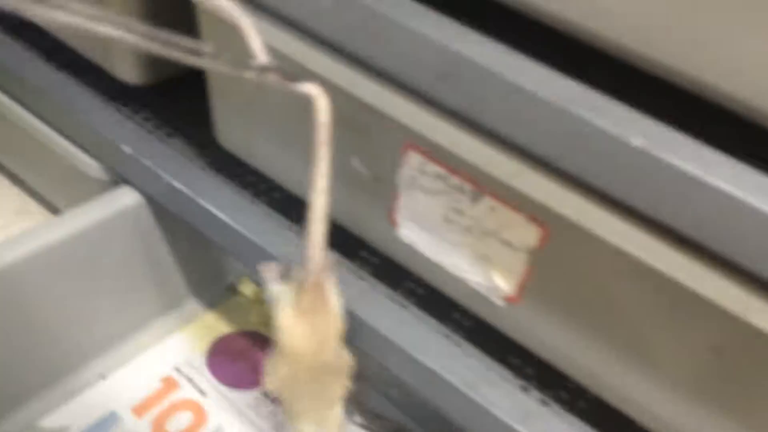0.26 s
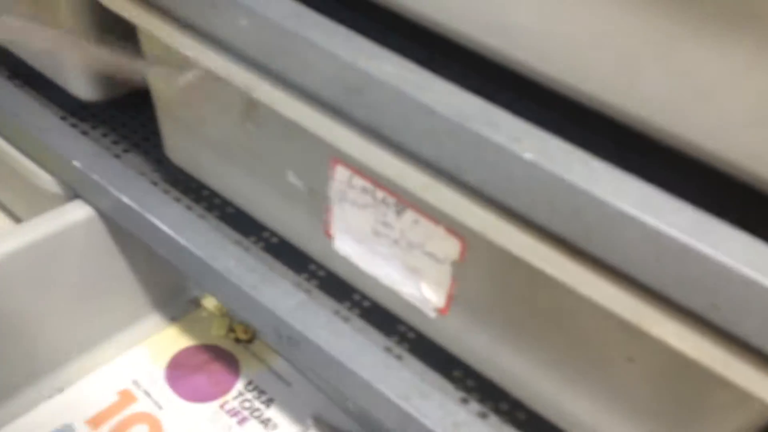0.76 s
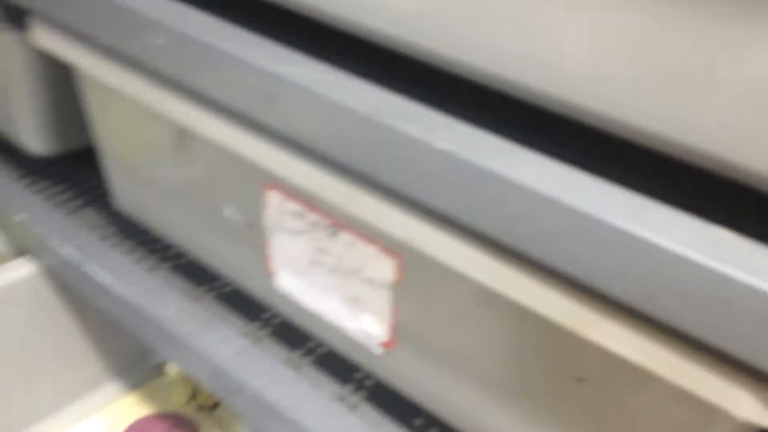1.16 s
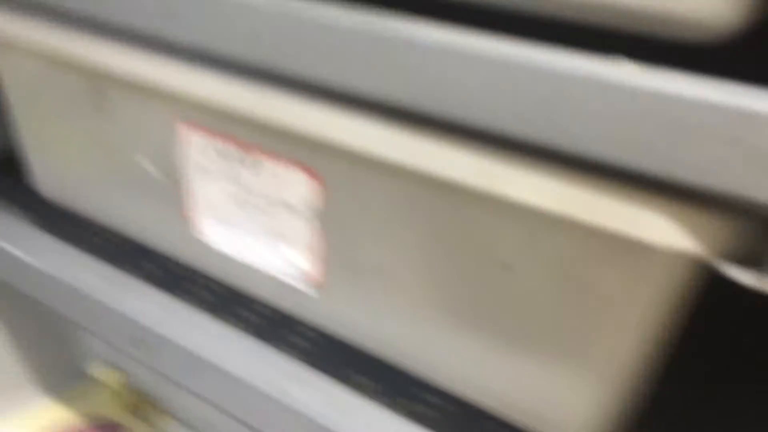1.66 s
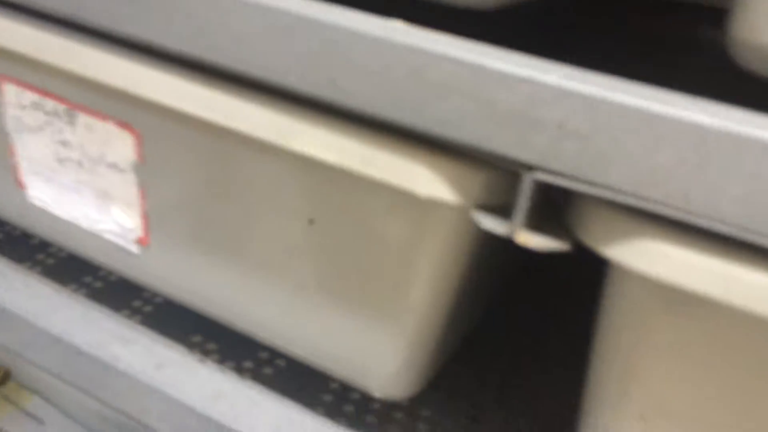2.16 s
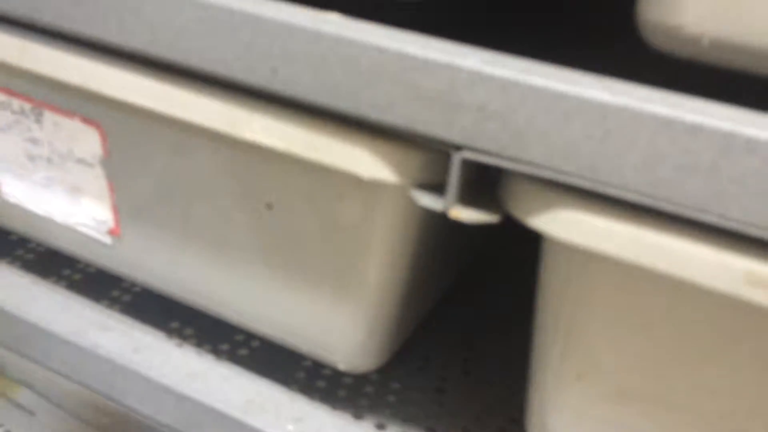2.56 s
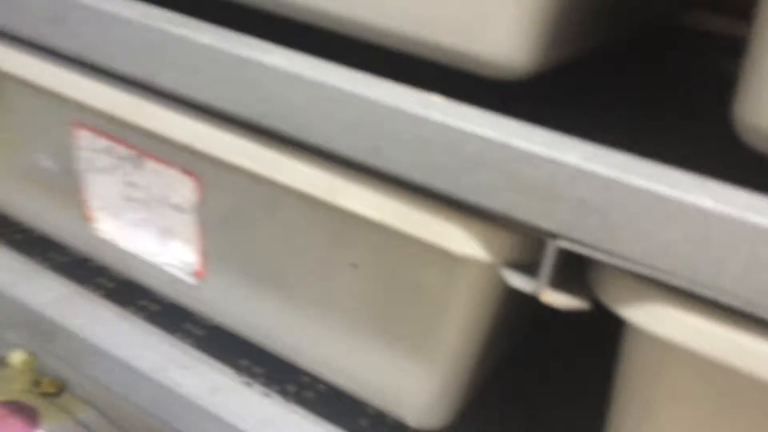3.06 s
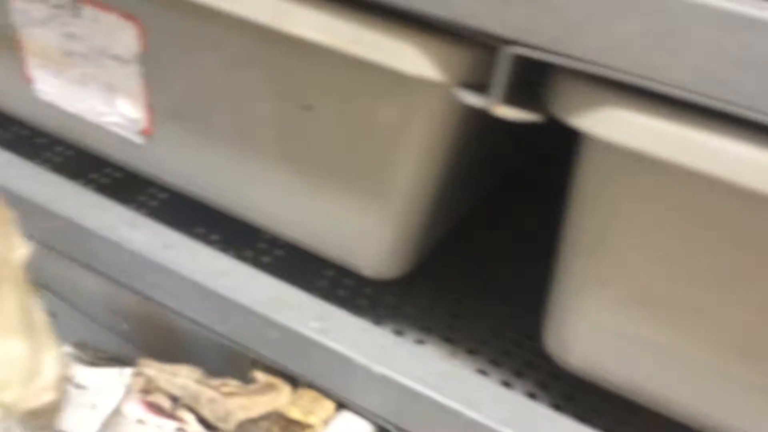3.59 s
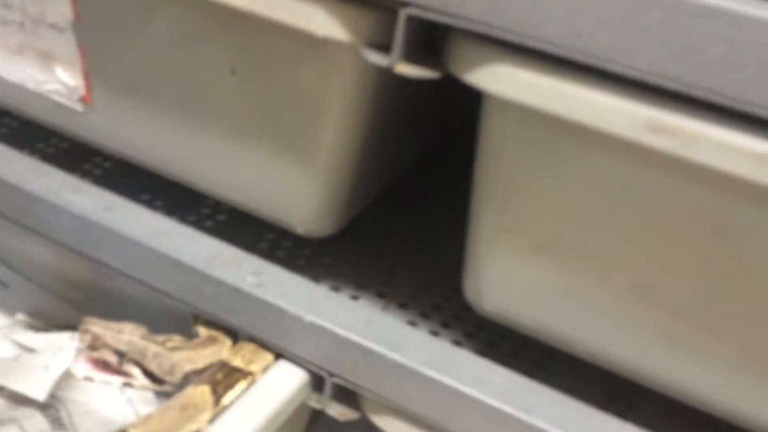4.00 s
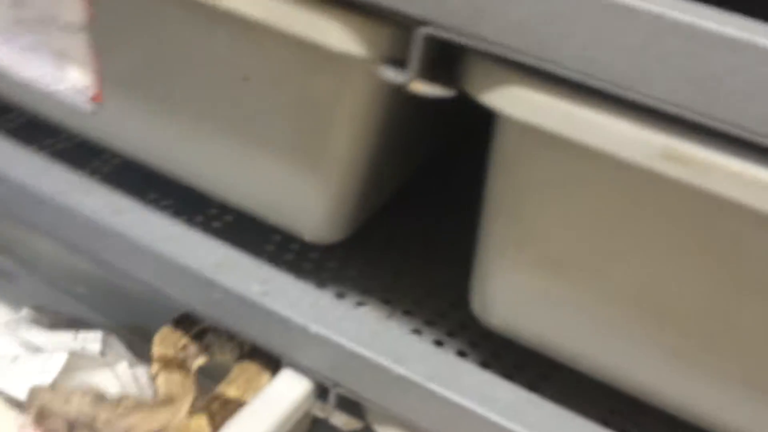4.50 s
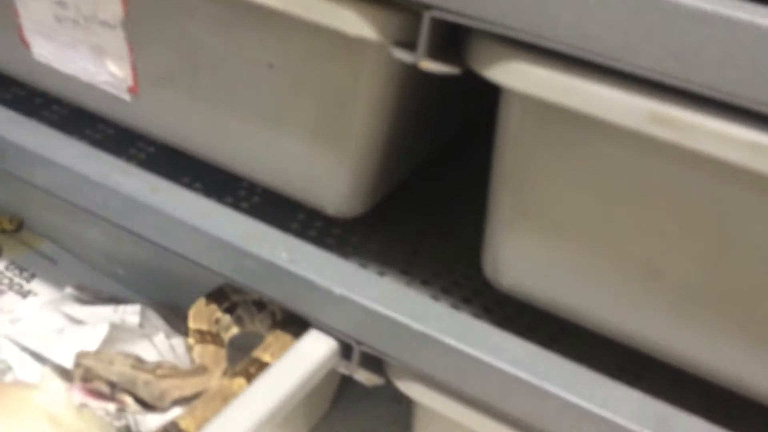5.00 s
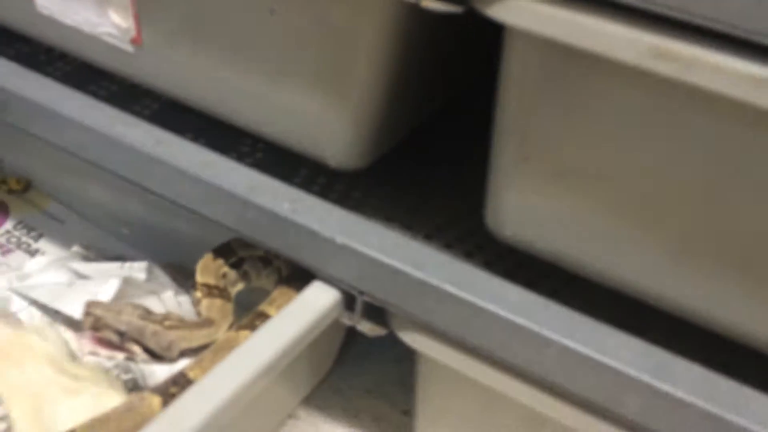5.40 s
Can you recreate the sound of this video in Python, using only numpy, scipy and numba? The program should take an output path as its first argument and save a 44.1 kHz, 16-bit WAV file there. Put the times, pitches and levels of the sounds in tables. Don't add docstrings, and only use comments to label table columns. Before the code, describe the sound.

Close, dry mono phone sound in an indoor rack room with faint ventilation and a barely audible low hum. At 0 s the end of a snake's hiss fades away within half a second. Paper slides and its creases snap crisply from about 0.15 s, densest between 0.6 and 0.95 s, with a sharp steel-tongs clack at 0.6 s. From 1 to 2.7 s only light rustles and scattered crinkles remain, with a very thin airy whistle. At about 2.75 s a long, rough, breathy hiss bursts in, strongest near 2.9 s, with low hollow thumps of coils on plastic around 3.1 s. It eases, with a lighter knock at 3.76 s. Near 4.2 to 4.45 s come bright metallic ticks, a cluster of dull thumps and dragging, as the hiss swells again around 4.4 s. It weakens gradually, with another hollow knock and scuff at 5.13 to 5.2 s, still hissing softly at the end.

```python
import sys
import numpy as np
from scipy import signal
from scipy.fft import rfft, irfft
from scipy.io import wavfile
from scipy.ndimage import uniform_filter1d, minimum_filter1d
from numba import njit

SR = 44100
rng = np.random.default_rng(int(sys.argv[2]) if len(sys.argv) > 2 else 0)


def volts_from_db(level):
    exponent = np.asarray(level, float) / 20
    return 10 ** exponent


def materialize(psi):
    bounded = np.clip(np.atleast_2d(psi).T, -1, 1)
    quanta = np.round(bounded * 32767).astype(np.int16)
    wavfile.write(sys.argv[1], SR, quanta)


N = 249165

# frequency in Hz, level in dB per Hz.
ROOM_SPECTRUM = [(15, -35), (25, -18), (64, -21), (198, -1.5), (304, -19), (565, -2.5), (1140, -7),
                 (1700, -12), (1810, 5), (1930, -12), (4850, -4.5), (6180, 2), (9240, -7.5), (12400, 1),
                 (15400, -2.5)]
# frequency in Hz, width in Hz, level in dB.
MAINS_HUM = (60, 5.2, -72.5)
# time in seconds, depth in dB, half-length in seconds.
GATE_CLOSINGS = [
    (0.579, -15, 0.031),
    (1.42, -1, 0.067),
    (1.55, -2, 0.046),
    (1.763, -2.5, .04),
    (2.736, -32, 0.036),
]
# peak in seconds, level in dB, seconds to rise 10 dB,
# seconds to fall 10 dB, pitch in Hz.
INHALES = [
    (1.5, -63.5, 4, -0.1, 6050),
    (2.64, -62, -0.2, 1, 5200),
]

# peak in seconds, level in dB, seconds to rise 10 dB, seconds to fall 10 dB,
# treble relative to level in dB.
PAPER_STROKES = [(.25, -54, 4, 0, -9), (.4, -51.5, 3, 0.17, -9), (.51, -52, 0.5, 0, -3),
                 (.7, -46.5, 0.2, -0.1, -23), (.76, -50, -0.07, 0.46, -22), (.86, -50, 0.1, -0.03, -32),
                 (.92, -40.5, 0.15, 0.09, -27), (1.05, -49, 0.13, 0.08, -6), (1.26, -53.5, 0.4, 0.18, -9),
                 (1.45, -62, -2, 0.3, -3), (1.67, -52, 0, 0, -10), (1.76, -68, 0.1, -1.5, -11),
                 (1.845, -56, 0.025, 0.08, -4), (2.02, -59.5, 0.15, 0.2, -3.5),
                 (2.2, -58.5, 0.13, 0.59, -11), (2.44, -65, 0.2, 2, 0), (2.67, -68, 0.2, 0.5, 5)]
# peak in seconds, level in dB, seconds to rise 10 dB, #
# seconds to fall 10 dB, centre in Hz, width in Hz.
BREATH_PUFF = (0.495, -50, .07, 0.05, 3300, 1800)
# time in seconds, peak in dB, pitch in Hz, t60 in seconds,
# treble in dB.
CREASE_SNAPS = [(.145, -30, 5660, 0.029, -14), (.179, -36, 4800, 0.027, -11), (.243, -48, 1940, 0.025, -12),
                (.261, -32.5, 1400, 0.043, -22), (.309, -29.5, 3300, .028, -5),
                (.358, -20.5, 2500, 0.032, -2), (.292, -35.5, 2600, .025, -15), (.387, -42, 2500, .025, -5),
                (.502, -40, 3100, .025, -15), (.551, -40, 3500, 0.018, -9), (.598, -44, 3000, .02, 2.5),
                (.608, -11.5, 3460, 0.014, -23), (.64, -23, 2450, 0.013, 2), (.676, -31, 1970, 0.075, -25),
                (.6795, -26, 2480, 0.024, -18), (.682, -17.5, 3250, 0.038, -21.5),
                (.7, -14, 2670, 0.022, -26), (.708, -25, 2480, .02, -14), (.719, -29, 2420, 0.037, -12),
                (.749, -35, 3500, .02, -18), (.774, -15.5, 2620, 0.026, -11.5),
                (.802, -33, 3000, 0.022, -9), (.830, -31, 1880, 0.036, -6), (.833, -37, 2200, 0.022, 5),
                (.853, -25.5, 2000, 0.043, -27), (.86, -23, 2870, 0.026, -30),
                (.867, -22, 2000, 0.025, -22), (.886, -48, 4500, .02, -15), (.876, -35, 2400, .025, -14),
                (.892, -30, 3080, 0.031, 2), (.897, -30.5, 851, 0.046, 3), (.909, -19.5, 2600, 0.015, -19),
                (.916, -25, 3050, 0.024, -19), (.922, -32, 2500, 0.022, -12), (.929, -31, 1980, 0.031, 2),
                (.94, -41, 2500, 0.022, -12), (.952, -38, 2600, .025, -4)]
# time in seconds, peak in dB, pitch in Hz, treble in dB.
SETTLING_CREASES = [(1.038, -35.5, 3380, -24.5), (1.089, -39, 5590, -15), (1.162, -33, 4140, -1.5),
                    (1.291, -48, 895, -15.5), (1.401, -50, 900, -12), (1.469, -38, 1950, -16),
                    (1.649, -41, 2180, -4), (1.654, -27, 2380, -4), (1.681, -41.5, 1600, -18),
                    (1.705, -47, 1400, -12), (1.829, -43, 2570, -15), (1.854, -42.5, 2660, 6.5),
                    (1.874, -39.5, 3090, -9), (1.929, -49, 2250, -11), (1.971, -43, 2920, -6),
                    (2.009, -51, 1100, -7), (2.065, -45.5, 3300, 0), (2.13, -34, 3270, -14.5),
                    (2.147, -39, 2370, -3), (2.18, -39, 2010, -5), (2.24, -47, 1190, -15),
                    (2.26, -41.5, 2380, -9), (2.373, -36, 1980, -2), (2.42, -32, 2180, -9),
                    (2.478, -44, 1950, -8), (2.513, -44, 3060, -14), (2.542, -43, 2880, -8.5),
                    (2.563, -52.5, 3000, -8), (2.646, -41, 3280, -21.5), (2.708, -38, 2700, -27.5)]
# time in seconds, peak in dB, pitch in Hz, t60 in seconds,
# treble in dB.
STRIKE_TICKS = [
    (4.187, -25, 5600, 0.055, 2),
    (4.188, -31, 2120, 0.023, -17),
    (4.299, -29, 2930, 0.07, -8),
    (4.349, -19, 2880, 0.089, 1),
    (4.354, -26, 3200, 0.025, -8),
    (4.382, -17.5, 2370, 0.042, -3),
    (4.428, -30, 1500, 0.05, -9),
    (4.447, -23, 4500, .03, -9),
]
# frequency in Hz, width in Hz, level in dB.
TONG_MODES = [(6050, 260, -24), (7250, 240, -5), (8750, 2200, -11), (10500, 380, -12), (11980, 800, -14),
              (14050, 1100, -14), (15040, 650, -10)]
# time in seconds, ring in dB, tail in dB, slap in dB.
TONG_CLACKS = [
    (0.6078, -10, -9, -5.5),
    (4.187, -11, -11, -46),
]

# time in seconds, peak in dB, pitch in Hz, upper ring in dB.
COIL_THUMPS = [(0.6073, -34, 116, -1), (.686, -45, 150, -20), (.704, -46, 130, -20), (.852, -48, 140, -20),
               (1.694, -45.5, 130, -9), (2.882, -37.5, 112, -7), (3.07, -35, 148, 3), (3.082, -30, 233, 0),
               (3.102, -15.5, 222, -24), (3.109, -26, 170, -25), (3.1149, -21, 174, -21),
               (3.123, -23.5, 159, -13.5), (3.139, -25.5, 146, -17), (3.164, -32.5, 285, -27),
               (3.755, -41, 870, -17), (3.7655, -39, 596, -21), (3.771, -33, 279, -8),
               (3.781, -37.5, 480, -11.5), (3.792, -39, 517, -15), (3.797, -41.5, 120, -20),
               (3.84, -49, 109, -20), (4.255, -28, 151, -28), (4.2614, -31, 154, -24),
               (4.2671, -27, 147, -30), (4.278, -26, 157, -17), (4.283, -28, 156, -11),
               (4.293, -29, 189, -9), (4.304, -31, 191, -4), (4.333, -30, 206, -12), (4.344, -36.5, 121, 5),
               (4.36, -39, 138, 4.5), (4.383, -34.5, 131, -2.5), (4.42, -33.5, 118, 0),
               (4.986, -48.5, 180, -13.5), (5.130, -25, 385, -20), (5.1371, -28, 250, -20),
               (5.14, -23, 199, -33), (5.152, -24, 254, -17), (5.163, -33, 160, -20),
               (5.177, -33, 328, -14), (5.184, -31, 364, -10), (5.195, -33, 240, -17),
               (5.207, -35, 340, -21), (5.214, -31.5, 298, -15), (5.262, -43, 275, -15),
               (5.295, -42, 365, -7)]
# time in seconds, peak in dB, pitch in Hz, upper ring in dB.
RIM_TAPS = [
    (.262, -35.5, 1100, -5),
    (.553, -47, 900, -12),
    (.609, -24.5, 516, -17),
    (.8, -47, 605, -19.5),
    (1.168, -46.5, 702, -16),
    (1.292, -44.5, 750, -13),
    (1.401, -55, 742, -11),
    (2.012, -57, 810, 5),
    (5.183, -38, 870, -18),
    (5.203, -41, 870, -19),
]
# time in seconds, peak in dB, pitch in Hz, upper ring in dB.
WALL_REBOUNDS = [
    (3.761, -26.5, 576, -10),
    (5.1255, -16, 267, -32),
    (3.097, -25, 297, -20),
]
# peak in seconds, deep modes in dB, seconds to rise 10 dB,
# seconds to fall 10 dB, higher modes relative to deep in dB.
BODY_DRAGS = [
    (0.0, -60.5, .1, .5, 7),
    (.8, -61, 0.5, 1, -8.5),
    (2.88, -63, -0.4, -4, -26),
    (3.13, -50.5, 0.4, 0.2, -3.5),
    (3.8, -53.5, 0.03, 0.24, -2),
    (4.38, -44.5, 0.06, 0.1, -5.5),
    (4.48, -59.5, -1.7, 0.6, -5.5),
    (5.2, -47.5, 0.06, 0.035, 6.5),
    (5.3, -60.5, 0.7, 0.2, 2.5),
]
# frequency in Hz, width in Hz, level in dB.
WALL_MODES = [
    [(72.7, 45, 6.5), (104, 27, 4), (139, 43, -1)],
    [(193, 26.4, 2.5), (278, 92, -3), (365, 66, -4.5)],
]

# frequency in Hz, level in dB per Hz.
JET_SPECTRUM = [(700, -40), (1300, -9.5), (1800, -8), (2300, -6.5), (5000, -2.5), (6600, -7), (9000, -3.5),
                (13000, -3), (14800, -5), (15400, -9)]
# frequency in Hz, width in Hz, level in dB.
TUB_AIR_MODES = [(348, 109, 0.5), (562, 37, -5.5), (712, 107, 0), (946, 110, 0), (1400, 64, 0),
                 (1817, 48, 2), (1896, 130, -9), (2210, 270, 6.5)]
# time in seconds, flow in dB, mouth resonance in Hz, gape from 0 to 1,
# upper resonance in Hz, palate resonance in dB.
BREATHS = [
    [(0.0, -40, 3120, 0.52, 10600, -4), (.164, -46.5, 3400, 0.73, 10500, -8),
     (.27, -53.5, 3320, 0.54, 10000, 5), (.45, -66, 3170, 0.7, 9500, -5)],
    [(2.755, -70, 3000, .4, 9500, -2.5), (2.785, -49.5, 3050, .3, 9500, -11.5),
     (2.81, -36.5, 3440, 0.27, 10200, -3), (2.86, -31.5, 4320, 0.07, 10800, -5.5),
     (2.93, -29, 4350, 0.62, 10800, -14), (3.04, -31.5, 3600, 0.85, 10680, -13),
     (3.3, -34, 3590, 0.27, 9900, 1), (3.45, -37, 3470, 0.42, 10500, 6), (3.64, -41, 3320, 0.13, 10000, 6)],
    [(3.9, -41.5, 3340, 0.25, 9500, 4.5), (4.23, -41, 3410, 0.25, 9604, 5),
     (4.33, -38, 3120, 0.17, 9800, 2), (4.38, -31, 3410, 0.3, 10500, -13),
     (4.55, -34.5, 3470, 0.3, 10300, -6), (4.7, -38.5, 3340, 0.24, 9500, 0),
     (4.89, -40, 3214, 0.2, 9450, 3), (5.2, -42, 3100, 0.22, 9600, 2), (5.65, -46, 3100, 0.43, 9700, 0)],
]
# dB at calm flow, dB per dB of extra flow, dB gained wide open.
RESONANCE_LAWS = [(6.5, 0.4, -14), (3, 0.3542, -2), (-6, -0.58, 15.5), (7, -0.45, -13.5),
                  (-12.5, -0.5, 2.5)]
RESONANCE_WIDTHS_HZ = (530, 1980, 1100, 470, 1550)
# frequency in Hz, width in Hz, flow in dB where its gain is 0 dB, dB
# gained per dB of flow.
SURGE_RESONANCE = (4744, 1498, -32.5, 0.5)
# frequency in Hz, width in Hz, dB at calm flow, dB per dB of extra flow.
TEETH_EDGE = (13200, 2600, -6.5, 0.53)
# frequency ratio, width in Hz, depth from 0 to 1.
UPPER_VALLEY = (0.84, 480, 0.14)
# start in seconds, seconds to turn, centre in Hz, width in Hz,
# depth from 0 to 1.
HEAD_TURN = (4.25, .2, 14250, 1500, .5)
# frequency in Hz, width in Hz.
CORNER_POCKET = (1044, 49)
# dB relative to calm flow, dB per dB of extra flow.
CORNER_STRENGTH = (-16, -0.28)
# peak in seconds, level in dB,
# seconds to rise 10 dB, seconds to fall 10 dB, pitch in Hz.
LIP_WHISTLES = [(.06, -51, -2, .08, 5300), (.03, -56, 5, -0.05, 2100), (0.084, -56.5, .1, 0.7, 6900),
                (2.75, -53.5, 0.03, 0.6, 1950), (2.8, -60, 0.08, 1.5, 4100),
                (2.98, -49.5, 0.03, -0.4, 5600), (2.91, -39.5, .06, .12, 3030),
                (3.13, -41, .06, -0.04, 3170), (3.02, -36, -0.01, -0.35, 5320),
                (3.08, -44, -0.02, 0.2, 6050), (4.43, -42, 0.08, 0.24, 4600), (4.46, -44, 0.12, 0.53, 6000),
                (4.45, -40.5, .1, 0.24, 3460), (4.7, -46, 0.16, 0.22, 3200), (3.25, -42.5, .12, 0.13, 3400),
                (4.52, -51, 0.19, 0.5, 4420)]

TOP_HZ = 15280
CALM_DB = -42


def unit(x):
    return x / np.sqrt(np.mean(x ** 2))


def noise():
    return rng.standard_normal(N)


def coloured(points):
    hz, db = np.transpose(points)
    log_f = np.log(np.arange(N // 2 + 1) * SR / N + 1)
    return unit(irfft(rfft(noise()) * volts_from_db(np.interp(log_f, np.log(hz), db)), N))


def walk(rate):
    hold = int(SR / rate)
    steps = np.repeat(rng.standard_normal(N // hold + 1), hold)
    return 1.39 * uniform_filter1d(uniform_filter1d(steps, hold), hold)[:N]


@njit
def svf(x, hz, width):
    y, b, l = np.empty(len(x)), 0., 0.
    for i in range(len(x)):
        g, k = np.tan(np.pi * hz[i] / SR), width[i] / hz[i]
        v = (b + g * (x[i] - l)) / (1 + g * (g + k))
        b, l, y[i] = 2 * v - b, l + 2 * g * v, k * v
    return y


def band(x, hz, width):
    still = np.zeros(len(x))
    return svf(x, np.clip(hz + still, 20, SR / 2.3), np.clip(width + still, 1, SR / 2))


def resonance(x, hz, width, wider=2):
    return unit(band(band(x, hz, width), hz, wider * width))


def fade(t, t60):
    return np.exp(-np.log(1000) * t / np.clip(t60, .004, 1))


def add(out, s, sound):
    i = max(int(s * SR), 0)
    out[i:i + len(sound)] += sound[:N - i]


def echo(x, t60, db):
    t = np.arange(SR // 4) / SR
    tail = rng.standard_normal(len(t)) * fade(t, t60) * (t > .001)
    return x + volts_from_db(db) * signal.fftconvolve(x, tail / np.sqrt(np.sum(tail ** 2)))[:N]


def columns(table):
    s, *cols = np.transpose(table)
    t = np.arange(N) / SR
    mask = np.clip(np.minimum(t - s[0], s[-1] - t) / .02 + 1, 0, 1)
    return mask, [np.interp(t, s, c) for c in cols]


def strokes(table):
    s, db, rise, fall, other_db = np.transpose(table)[:, :, None]
    t = np.arange(N) / SR - s
    drop = np.where(t < 0, -t / np.clip(rise, .01, 2), t / np.clip(fall, .01, 2))
    gain = volts_from_db(db - 10 * drop)
    other = gain * volts_from_db(other_db)
    return np.sqrt(np.sum(gain ** 2, axis=0)), np.sqrt(np.sum(other ** 2, axis=0))


def swell(row):
    return strokes([(*row[:4], 0)])[0]


def room():
    hz, width, db = MAINS_HUM
    ventilation = volts_from_db(-57.5 + 0.23 * walk(9.3)) * coloured(ROOM_SPECTRUM)
    return ventilation + volts_from_db(db) * resonance(noise(), hz, width)


def inhale():
    return sum(swell(row) * resonance(noise(), row[4], 350) for row in INHALES)


def rustle():
    gain, treble = strokes(PAPER_STROKES)
    bass = volts_from_db(-13.5) * np.clip(gain / volts_from_db(-58.0), .5, 10) ** -.5
    grains = unit(noise() * volts_from_db(2.0 * walk(300) + 1.5 * walk(50)))
    body = unit(band(band(grains, 1640, 4700), 2040, 6000))
    sizzle = unit(band(band(noise(), 9000, 9000), 9000, 12000)) * volts_from_db(1.5 * walk(30))
    under = unit(band(band(grains, 650, 480), 640, 960))
    puff = swell(BREATH_PUFF) * resonance(grains, BREATH_PUFF[4], BREATH_PUFF[5])
    return gain * (body + bass * under) + treble * sizzle + puff


def gate(x):
    t = np.arange(N) / SR
    gain = volts_from_db(sum(db * np.exp(-((t - s) / half) ** 2) for s, db, half in GATE_CLOSINGS))
    treble = signal.sosfilt(signal.butter(1, 2600, "high", fs=SR, output="sos"), x)
    return x - (1 - gain) * treble


def settling():
    return [(s, db, hz, 0.03 * (2500 / hz) ** 0.68, treble_db) for s, db, hz, treble_db in SETTLING_CREASES]


def snaps(table, low_db):
    out, t = np.zeros(N), np.arange(2500) / SR
    for s, db, hz, t60, treble_db in table:
        burst = rng.standard_normal(len(t))
        kick = burst * (fade(t, t60) + 0.5 * fade(t, 0.0017)) * (1 - np.exp(-t / 0.00023))
        kick[8] = 2.8
        ring = band(band(kick, hz, 1.52 * hz), 0.9 * hz, 2 * hz)
        treble = band(band(kick * fade(t, 0.041), 6700, 10600), 6900, 13500)
        low = band(kick * fade(t, 0.013), 370, 790)
        ring, treble, low = (part / np.abs(part).max() for part in (ring, treble, low))
        add(out, s - .0003, volts_from_db(db) * (ring + volts_from_db(treble_db) * treble + volts_from_db(low_db) * low))
    return out


def tongs():
    out, t = np.zeros(N), np.arange(9000) / SR
    bounces = ((.0002, 1), (.001, .8), (.0024, .45))
    for s, db, tail_db, slap_db in TONG_CLACKS:
        rattle = rng.standard_normal(len(t)) * (fade(t, 0.032) + volts_from_db(tail_db) * fade(t, 0.24))
        ring = sum(volts_from_db(g) * band(rattle, f, w) for f, w, g in TONG_MODES)
        slap = sum(g * np.exp(-((t - lag) / .00006) ** 2) for lag, g in bounces)
        add(out, s, volts_from_db(db) * ring / np.abs(ring).max() - volts_from_db(slap_db) * slap)
    return out


def wall_blows(table, sign):
    out, t = np.zeros(N), np.arange(6000) / SR
    for s, db, hz, upper_db in table:
        t60 = 0.057 * volts_from_db(-0.4 * (db + 34)) * (250 / max(hz, 120)) ** 0.42
        rise = 1 - np.exp(-t * hz / 0.23)
        upper = band(band(rng.standard_normal(len(t)) * fade(t, .06), 750, 600), 750, 800)
        ring = np.sin(2 * np.pi * hz * t) * fade(t, t60)
        ring += 0.39 * np.sin(2 * np.pi * 1.41 * hz * t) * fade(t, 0.76 * t60)
        add(out, s - .001, sign * volts_from_db(db) * rise * (ring + volts_from_db(upper_db) * upper / np.abs(upper).max()))
    return out


def wall_drag():
    drag, drag_higher = strokes(BODY_DRAGS)
    shake = noise() * volts_from_db(2.2 * walk(68))
    deep, higher = (unit(sum(volts_from_db(g) * band(band(shake, f, w), f, 2 * w) for f, w, g in modes))
                    for modes in WALL_MODES)
    return np.hypot(drag, volts_from_db(-72.5)) * deep + np.hypot(drag_higher, volts_from_db(-71.5)) * higher


def tub():
    return wall_blows(COIL_THUMPS, -1) + wall_blows(RIM_TAPS, -1) + wall_blows(WALL_REBOUNDS, 1) + wall_drag()


def whistles():
    return sum(swell(row) * volts_from_db(2 * walk(60)) * resonance(noise(), row[4], 260) for row in LIP_WHISTLES)


def tub_air():
    return unit(sum(resonance(noise(), f, w, 2.25) * volts_from_db(db + 1.5 * walk(12)) for f, w, db in TUB_AIR_MODES))


def mouth_resonances(jet, flow_db, effort, low_hz, gape, high_hz, palate_db, ring_dbs):
    centres = (low_hz * (1 + .012 * walk(9)), high_hz * (1 + .03 * walk(15)), 5860 * (1 + .01 * walk(4)),
               0.78 * low_hz, 7660 * (1 + .02 * walk(5)))
    widths = list(RESONANCE_WIDTHS_HZ)
    widths[0] = widths[0] * np.clip(low_hz / 3560, 1, 2) ** 3.5
    total = sum(volts_from_db(db + .8 * walk(20)) * resonance(noise(), hz, w, 1.5)
                for hz, w, db in zip(centres, widths, (*ring_dbs, palate_db)))
    surge_hz, surge_width_hz, match_db, slope = SURGE_RESONANCE
    surge_db = slope * (flow_db - match_db) - 4 * gape
    total += volts_from_db(surge_db) * resonance(noise(), surge_hz, surge_width_hz)
    edge_hz, edge_width_hz, edge_db, edge_slope = TEETH_EDGE
    return total + volts_from_db(edge_db + edge_slope * effort) * unit(band(jet, edge_hz, edge_width_hz))


def carve(mouth, effort, low_hz, high_hz):
    side_open = 1 - np.clip(effort / 9.5, 0, 1) ** 2
    mouth = mouth - .52 * side_open * band(mouth, 1.3 * low_hz, 950)
    ratio, width_hz, depth = UPPER_VALLEY
    mouth = mouth - depth * band(mouth, ratio * high_hz, width_hz)
    start_s, turn_s, hz, width_hz, depth = HEAD_TURN
    turned = np.clip((np.arange(N) / SR - start_s) / turn_s, 0, 1)
    return mouth - depth * turned * band(mouth, hz, width_hz)


def corner_song(flow_db, effort):
    base_db, per_db = CORNER_STRENGTH
    approach_db = 10 * np.minimum(np.arange(N) / SR - 3.67, 0) / 0.95
    return volts_from_db(flow_db + base_db + per_db * effort + approach_db) * resonance(noise(), *CORNER_POCKET)


def snake():
    jet = coloured(JET_SPECTRUM) * volts_from_db(.7 * walk(25))
    first_mask, first = columns(BREATHS[0])
    long_mask, long = columns(BREATHS[1] + BREATHS[2])
    mask = first_mask + long_mask
    late = np.arange(N) > 1.5 * SR
    flow_db, low_hz, gape, high_hz, palate_db = np.where(late, long, first)
    effort = np.clip(flow_db - CALM_DB, -8, 15)
    *ring_dbs, air_db = (db + per_db * effort + open_db * gape for db, per_db, open_db in RESONANCE_LAWS)
    rings = mouth_resonances(jet, flow_db, effort, low_hz, gape, high_hz, palate_db, ring_dbs)
    mouth = mask * volts_from_db(flow_db) * (volts_from_db(-2.0) * jet + volts_from_db(-10.5) * rings)
    mouth = carve(mouth, effort, low_hz, high_hz)
    sway = np.pi / 4 * (1 + np.tanh(walk(7)))
    walls = echo(mouth * np.cos(sway) ** 2, .022, -12) + echo(mouth * np.sin(sway) ** 2, .022, -12)
    return walls + corner_song(flow_db, effort) + mask * volts_from_db(flow_db + air_db + 1.5) * tub_air()


def scene():
    hits = snaps(CREASE_SNAPS, -27) + snaps(settling(), -20) + snaps(STRIKE_TICKS, -31) + tongs()
    background = gate(room() + inhale() + rustle())
    mono = background + echo(hits, 0.1, -21) + tub() + whistles() + snake()
    return np.array([mono, mono])


def dropouts(x):
    f, _, z = signal.stft(x, SR, nperseg=1024)
    field = uniform_filter1d(rng.standard_normal(z.shape), size=7, axis=1)
    field = uniform_filter1d(field, size=6, axis=0)
    share = .3 * np.clip((f - 7000) / (TOP_HZ - 7000), .1, 1) ** 2
    power = np.sum(np.abs(z) ** 2, axis=0)
    attack = power > 2 * minimum_filter1d(power, size=5)
    keep = (field > np.quantile(field, share)[:, None]) | attack
    return signal.istft(z * keep, SR, nperseg=1024)[1][:N]


def band_limit(x):
    return signal.sosfilt(signal.butter(12, 16490, fs=SR, output="sos"), x)


def record(dry):
    heard = signal.sosfilt(signal.butter(3, 48.5, "high", fs=SR, output="sos"), dry[0])
    cut = signal.sosfilt(signal.ellip(10, .2, 42, TOP_HZ, fs=SR, output="sos"), dropouts(heard))
    return band_limit(np.array([cut, cut]))


dry = scene()
out = record(dry)
materialize(out)
```